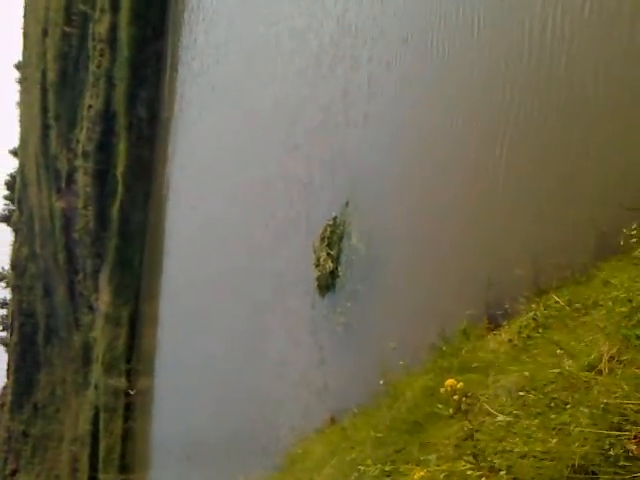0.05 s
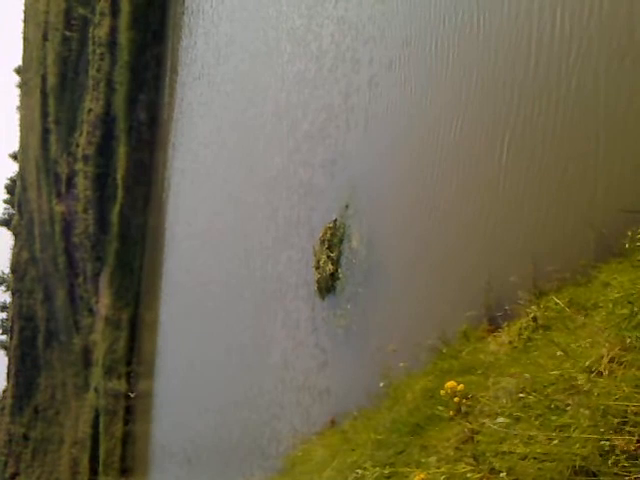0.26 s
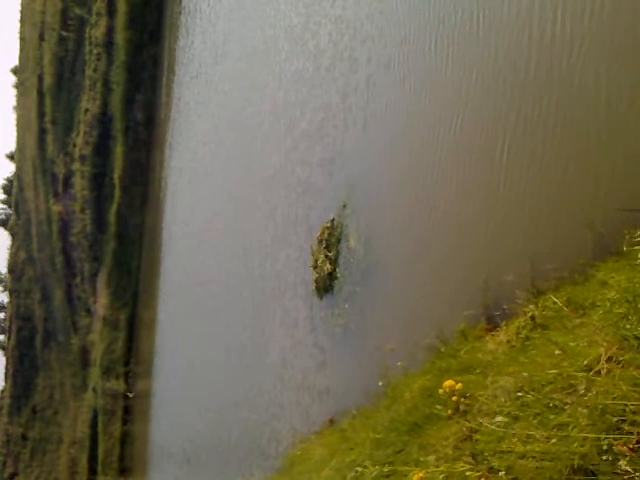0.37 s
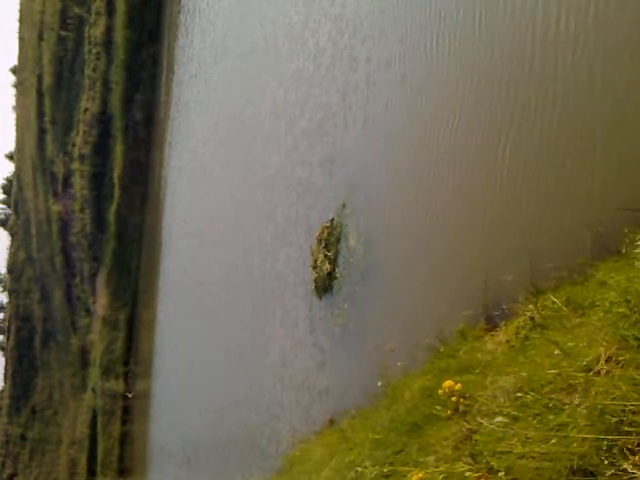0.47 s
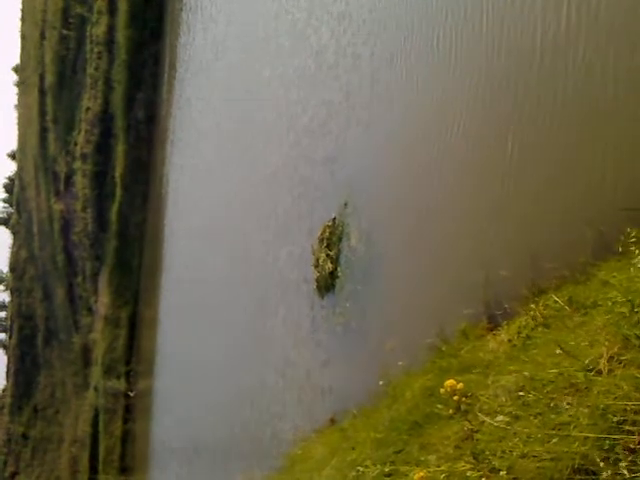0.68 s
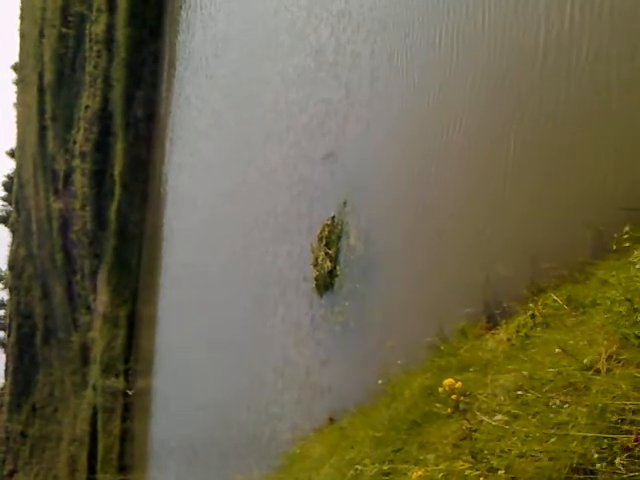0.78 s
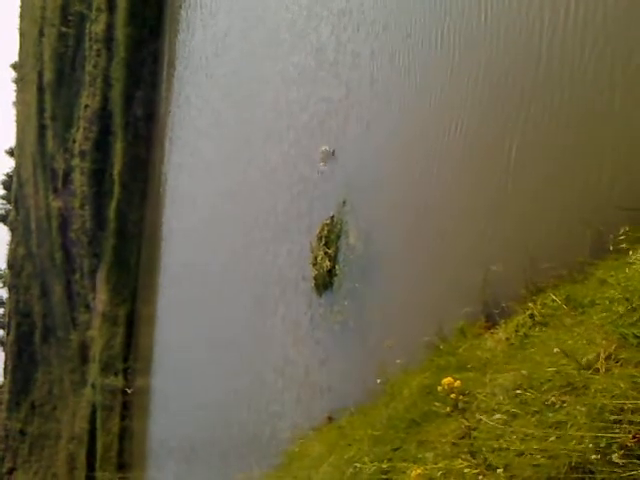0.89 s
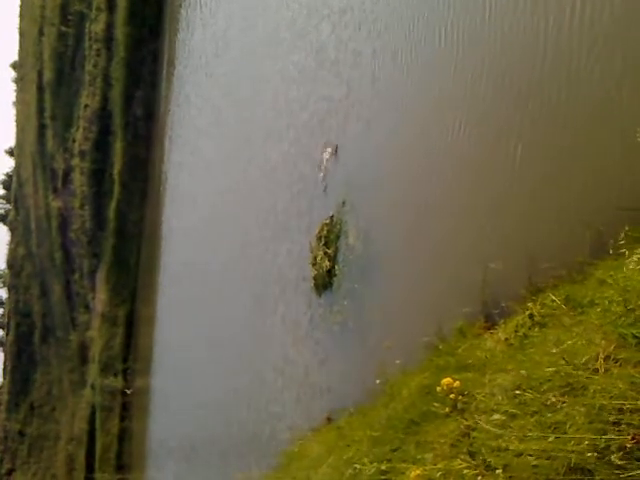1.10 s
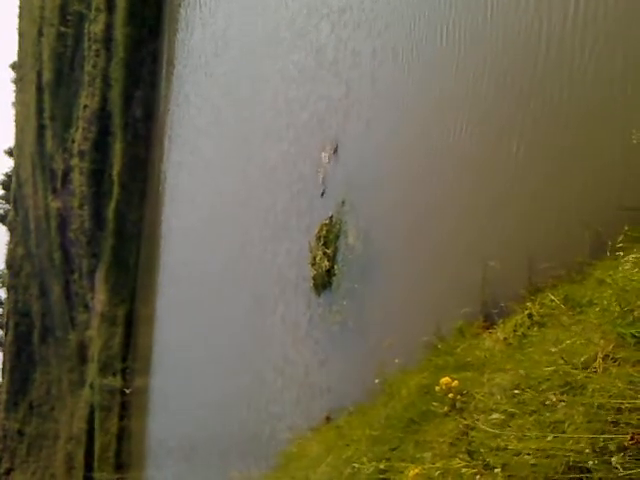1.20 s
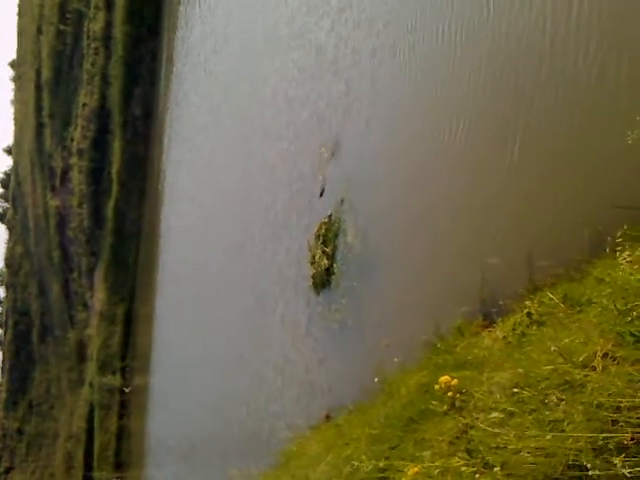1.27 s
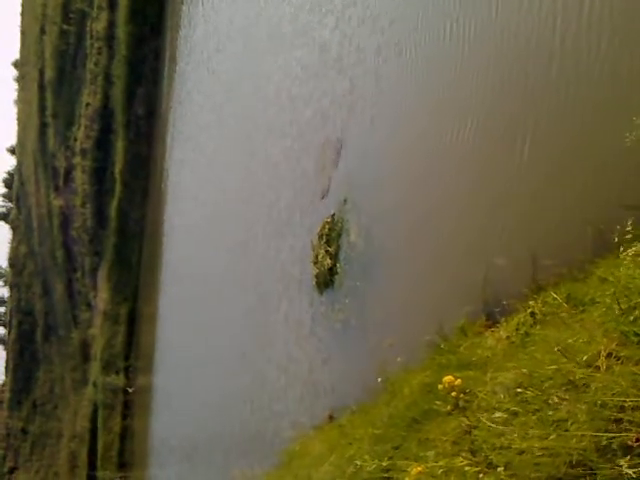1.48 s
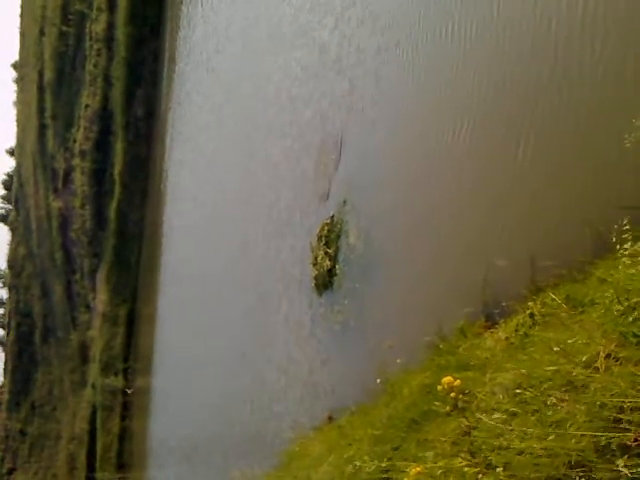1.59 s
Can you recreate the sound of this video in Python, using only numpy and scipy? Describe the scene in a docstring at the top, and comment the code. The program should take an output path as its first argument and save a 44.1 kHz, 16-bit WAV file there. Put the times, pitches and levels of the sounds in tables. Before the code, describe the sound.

Wind buffets the microphone on a pond bank, rising at about 0.2 seconds into fluttering, irregular low thumps over a deep rumble. The gust dies away around 1 second, as a fish flicks the surface twice, at about 1.0 and 1.15 seconds, each a quiet tick with light spray and small plops. The water settles with a faint slosh near 1.3 seconds, while rumble and soft hiss continue.

```python
"""A gust of wind buffets the microphone on the bank of a quiet pond: turbulence and single thumping
eddies right on the capsule, over a deep rumble. As it dies away a fish breaks the surface twice:
each flick is a sharp tick, a little spray and a few plopping bubbles that glide in pitch.
The water settles with a faint slosh, over a soft hiss."""
import sys
import numpy as np
from scipy import signal
from scipy.fft import rfft, irfft
from scipy.io import wavfile
from scipy.ndimage import uniform_filter1d

SR = 44100
rng = np.random.default_rng(int(sys.argv[2]) if len(sys.argv) > 2 else 0)


def int16_out(signal):
    """Quantize to a 16-bit WAV file."""
    q = np.round(np.clip(np.atleast_2d(signal).T, -1, 1) * 32767)
    wavfile.write(sys.argv[1], SR, q.astype(np.int16))


N = 72765
TIME = np.arange(N) / SR

# Wind at the microphone: the gust and the rumble under it. Each row: time in seconds, level in dB.
GUST_LEVEL = [(0, -40), (.06, -45), (.135, -53), (.228, -39), (.245, -31), (.28, -26), (.315, -20.5),
              (.345, -31.5), (.368, -29), (.397, -43.5), (.44, -27), (.50, -25.5), (.56, -22), (.62, -26),
              (.655, -25), (.70, -27), (.765, -28.5), (.805, -21.5), (.875, -28.5), (.935, -27),
              (1.005, -38), (1.04, -28.5), (1.08, -41.5), (1.21, -51), (1.24, -51), (1.45, -53.5),
              (1.65, -49)]
RUMBLE_LEVEL = [(0, -36.5), (.14, -41.5), (.22, -32), (.4, -35), (.76, -31.5), (.84, -38), (.9, -35.5),
                (1.05, -38), (1.25, -37.5), (1.65, -42)]
# Colours of the wind's three layers. Each row: frequency in Hz, relative level in dB.
TURBULENCE_SPECTRUM = [(20, -42), (70, -7.5), (120, -0.5), (175, 4), (290, -4.5), (440, -18), (620, -23),
                       (850, -44), (1300, -56), (3000, -69)]
EDDY_SPECTRUM = [(100, -38.5), (300, 3.5), (450, 2), (750, -19.5), (1100, -32.5), (1900, -47), (4000, -57)]
RUMBLE_SPECTRUM = [(10, -8), (25, -9.5), (55, -3.5), (85, -4.5), (130, -12), (250, -32.5), (600, -52),
                   (2000, -98.5)]
# Open air around the pond and a fine treble hiss. Each row: time in seconds, level in dB.
AIR_LEVEL = [(0, -58.5), (.6, -63), (1.0, -64), (1.35, -61.5), (1.65, -60)]
HISS_LEVEL = [(0, -58.5), (.2, -60), (.5, -61.5), (.8, -65.5), (1.0, -66.5), (1.15, -67), (1.35, -64.5),
              (1.5, -61), (1.65, -59.5)]
# Their colours. Each row: frequency in Hz, relative level in dB.
AIR_SPECTRUM = [(30, -14), (300, 1.5), (700, 2.5), (1100, -2), (1800, -3.5), (2600, -9.5), (3500, -7),
                (4600, -9.5), (6400, -19), (16000, -40)]
HISS_SPECTRUM = [(500, -18.5), (2500, -7), (4500, -9), (6400, -7.5), (8000, -1.5), (11000, -0.5),
                 (15500, 2)]
# Single eddies striking the microphone.
# Each row: start in seconds, level in dB, pitch in Hz, rise and decay in seconds.
BUFFETS = [(.052, -27, 134.5, 0.0095, 0.0017), (.175, -24.5, 84.7, 0.031, 0.033),
           (.2385, -15, 216, 0.0025, 0.0014), (.302, -12.5, 239.6, 0.0053, 0.0011),
           (.371, -17, 264, 0.0042, 0.0046), (.472, -12.5, 244, 0.0045, 0.002),
           (.486, -25.5, 616, 0.0037, 0.0022), (.518, -15, 305, 0.0026, 0.0039),
           (.555, -12.5, 221.6, 0.0026, 0.0088), (.637, -11, 169.6, 0.016, 0.018),
           (.642, -19.5, 395, 0.0018, 0.0037), (.739, -13, 259, .004, 0.0042),
           (.783, -9.5, 300, 0.0088, 0.0017), (.787, -23, 640, 0.0024, 0.00067),
           (.796, -12.5, 184, 0.0049, 0.0097), (.840, -29, 230, 0.0048, 0.0076),
           (.932, -19, 296, 0.0032, 0.0031), (.957, -17.5, 153, 0.0027, 0.011),
           (.99, -22.5, 109.7, 0.011, 0.035), (1.032, -15.5, 173, 0.0042, 0.0071),
           (1.235, -25.5, 129.6, 0.0074, 0.0085)]
# Ringing tones in the pond: bubbles and drops, and the high ring near 3.7 kHz of each flick's tick. Each row:
# start in seconds, # starting pitch in Hz, level in dB, rise and decay in seconds, glide in octaves per second.
RINGS = [(1.0213, 3700, -46.5, 0.0029, 0.0018, 45), (1.0342, 2040, -49, 0.0006, 0.0034, -17),
         (1.038, 1082, -42, 0.0044, 0.008, -12), (1.0553, 799, -28.5, .004, 0.0024, -9),
         (1.0625, 860, -40, 0.0018, 0.0033, 81), (1.082, 1660, -54, 0.001, 0.006, -8),
         (1.096, 597, -51, 0.0064, 0.034, -1.5), (1.1371, 3640, -36.5, 0.0018, 0.00074, 10),
         (1.1498, 970, -38, 0.0021, 0.0045, -11), (1.150, 1220, -44.5, 0.0038, 0.0038, 13),
         (1.168, 1520, -39, 0.0018, 0.00048, 6), (1.191, 853, -38.5, 0.0024, 0.0041, 87),
         (1.195, 3930, -56, 0.0012, 0.0044, 2), (1.2, 1473, -45, 0.0015, 0.0025, 66),
         (1.298, 3590, -52, 0.0027, 0.0022, 9), (1.33, 723, -50, 0.0046, 0.025, 1),
         (1.334, 3220, -52.5, .001, .002, 7), (1.364, 1830, -52, 0.0018, .002, 8)]
# The fish snapping the surface. Each row: start in seconds, level in dB.
FLICKS = [(1.0215, -48), (1.1378, -47)]
# Thrown water. Each row: start in seconds, level in dB, decay in seconds.
SPLASHES = [(1.033, -49, 0.031), (1.147, -51.5, 0.036), (1.193, -59.5, 0.016), (1.234, -63, 0.073),
            (1.328, -58.5, .045)]
# Colours of the snap and the spray. Each row: frequency in Hz, relative level in dB.
SNAP_SPECTRUM = [(600, -20), (2000, -7), (3000, -4), (3900, 0), (5000, -9), (7000, -19), (16000, -30)]
SPRAY_SPECTRUM = [(200, -6), (600, 18.5), (1100, 16), (1800, 6.5), (2400, 2.5), (3600, -2), (5000, -9),
                  (8000, -19), (16000, -23)]


def amp(db):
    """Decibels to gain."""
    return 10 ** (np.asarray(db) / 20)


def unit(x):
    """Scales to rms 1."""
    return x / np.sqrt(np.mean(x ** 2) + 1e-20)


def curve(points):
    """Joins (seconds, value) points over the whole scene."""
    return np.interp(TIME, *np.transpose(points))


def colour(x, spectrum):
    """Filters x by a spectrum of (Hz, dB) points, at rms 1."""
    hz, db = np.transpose(spectrum)
    bins = np.fft.rfftfreq(N, 1 / SR)
    gain = amp(np.interp(np.log(bins + 1), np.log(hz), db))
    return unit(irfft(rfft(x) * gain, N))


def noise(spectrum):
    """Coloured noise at rms 1."""
    return colour(rng.standard_normal(N), spectrum)


def steady(x, samples):
    """Evens out the slow swells of a noise, so that the wind sets its level."""
    power = uniform_filter1d(abs(signal.hilbert(x)) ** 2, samples)
    return unit(x / np.sqrt(power + 1e-3))


def wobble(top_hz):
    """Slow random motion at rms 1, rolling off around top_hz."""
    rolloff = np.exp(-(np.fft.rfftfreq(N, 1 / SR) / top_hz) ** 2)
    return unit(irfft(rfft(rng.standard_normal(N)) * rolloff, N))


def swell(start, rise_s, decay_s):
    """A smooth rise, then an exponential fall."""
    age = np.maximum(TIME - start, 0)
    attack = np.sin(np.pi / 2 * np.minimum(age / rise_s, 1)) ** 2
    return attack * np.exp(-np.maximum(age - rise_s, 0) / decay_s)


def wind(flutter_db=2.2, strong_gust_db=-24.5, eddy_growth=1.6):
    """Turbulence on the microphone over a deep rumble; small eddies grow faster and brighten the gust."""
    gust_db = curve(GUST_LEVEL)
    body = amp(gust_db) * steady(noise(TURBULENCE_SPECTRUM), samples=1000)
    eddy_db = -35.5 + eddy_growth * (gust_db - strong_gust_db)
    eddies = amp(eddy_db) * noise(EDDY_SPECTRUM)
    rumble = amp(curve(RUMBLE_LEVEL)) * steady(noise(RUMBLE_SPECTRUM), samples=4000)
    flutter = amp(flutter_db * wobble(top_hz=44))
    return (body + eddies) * flutter + rumble


def open_air():
    """Soft air around the pond and a fine hiss; both sink and come back."""
    air = amp(curve(AIR_LEVEL)) * noise(AIR_SPECTRUM)
    hiss = amp(curve(HISS_LEVEL)) * noise(HISS_SPECTRUM)
    return air + hiss


def buffets(overshoot=0.8, sink_s=0.0013, dull_hz=1323):
    """Eddies kick the capsule: each thump starts high and sinks to its pitch, with its treble dulled."""
    thumps = np.zeros(N)
    for start, db, hz, rise_s, decay_s in BUFFETS:
        age = np.maximum(TIME - start, 0)
        turns = hz * (age + overshoot * sink_s * (1 - np.exp(-age / sink_s)))
        thumps += amp(db) * swell(start, rise_s, decay_s) * np.sin(2 * np.pi * turns)
    dulling = signal.butter(3, dull_hz, fs=SR, output="sos")
    return signal.sosfiltfilt(dulling, thumps)


def ring(start, hz, db, rise_s, decay_s, glide):
    """A brief ringing tone, gliding by up to an octave: a pocket of air nearing the surface, or the high ring
    of a tick."""
    octaves = np.clip(glide * (TIME - start), -1, 1)
    turns = np.cumsum(hz * 2 ** octaves * (TIME > start)) / SR
    return amp(db) * swell(start, rise_s, decay_s) * np.sin(2 * np.pi * turns)


def snaps():
    """Out on the pond, the fish breaks the surface with a short dry crack at each flick."""
    envelope = sum(amp(db) * swell(start, rise_s=0.001, decay_s=0.002) for start, db in FLICKS)
    return noise(SNAP_SPECTRUM) * envelope


def spray(drops_per_s=3500, rise_s=0.0013):
    """Tiny drops patter back on the pond after each flick."""
    drops = rng.standard_normal(N) * (rng.random(N) < drops_per_s / SR)
    envelope = sum(amp(db) * swell(start, rise_s, decay_s) for start, db, decay_s in SPLASHES)
    return colour(drops, SPRAY_SPECTRUM) * envelope


def scene():
    """Wind, fish and open air at one microphone on the bank."""
    gust = wind() + buffets()
    fish = snaps() + spray() + sum(ring(*row) for row in RINGS)
    return (gust + fish + open_air())[None]


def record(dry):
    """A soft start and the recorder's band limit."""
    fade_in_s, band_limit_hz = 0.004, 15800
    faded = dry * np.minimum(TIME / fade_in_s, 1)
    lowpass = signal.firwin(511, band_limit_hz, window=("kaiser", 9), fs=SR)
    return signal.oaconvolve(faded, lowpass[None], "same")


dry = scene()
out = record(dry)
int16_out(out)
```